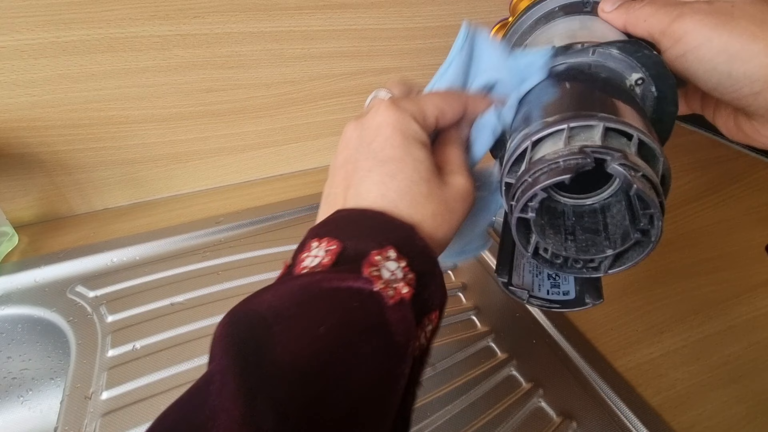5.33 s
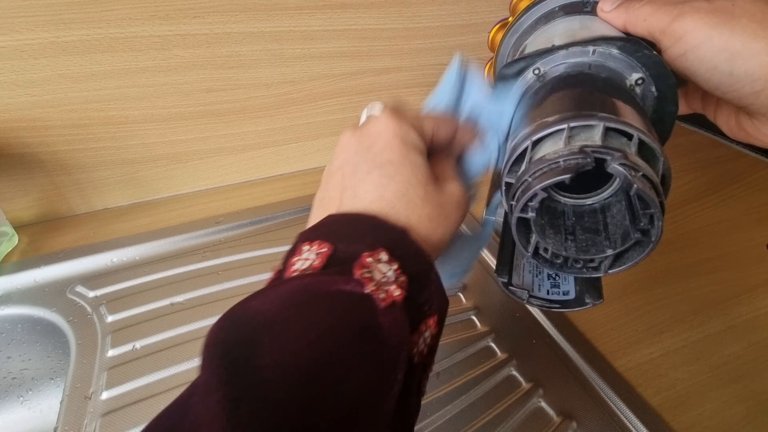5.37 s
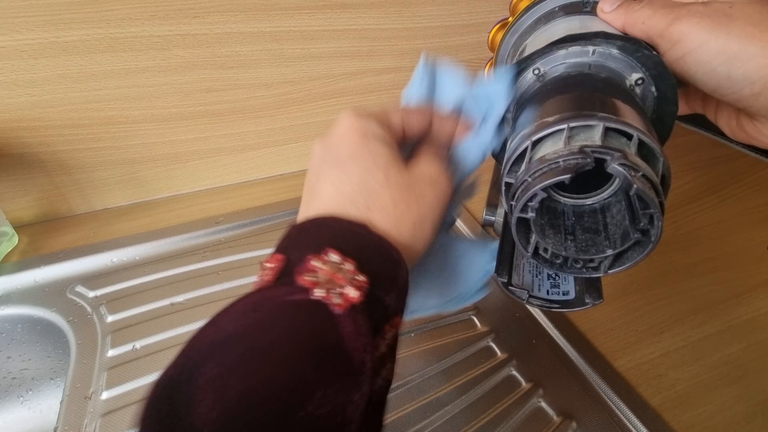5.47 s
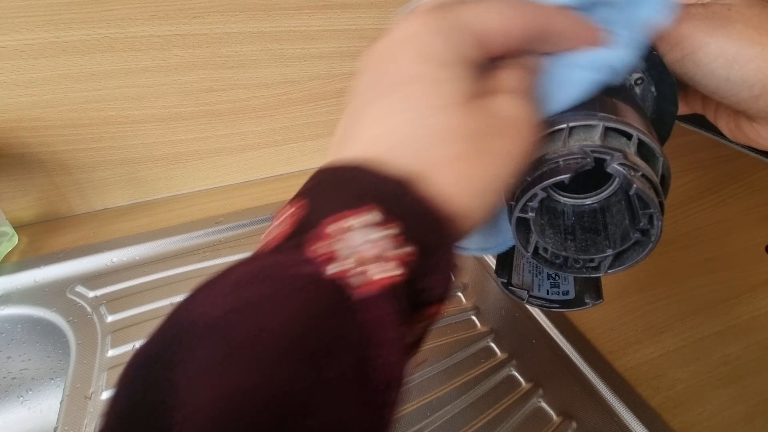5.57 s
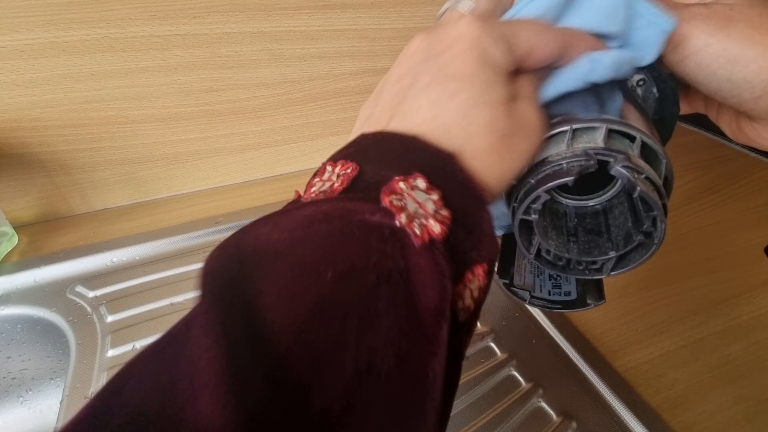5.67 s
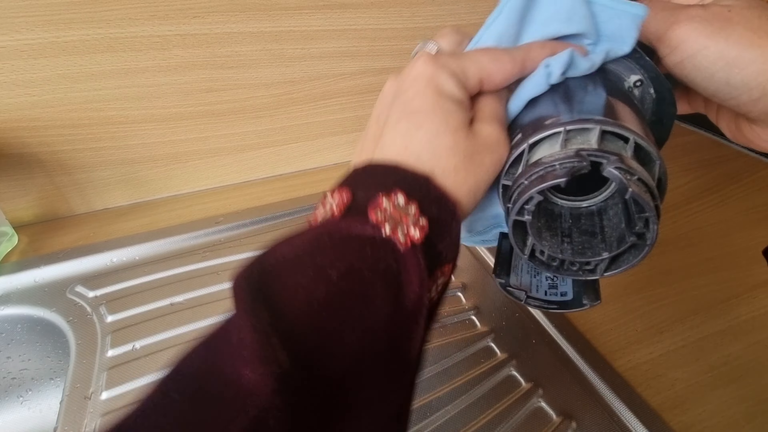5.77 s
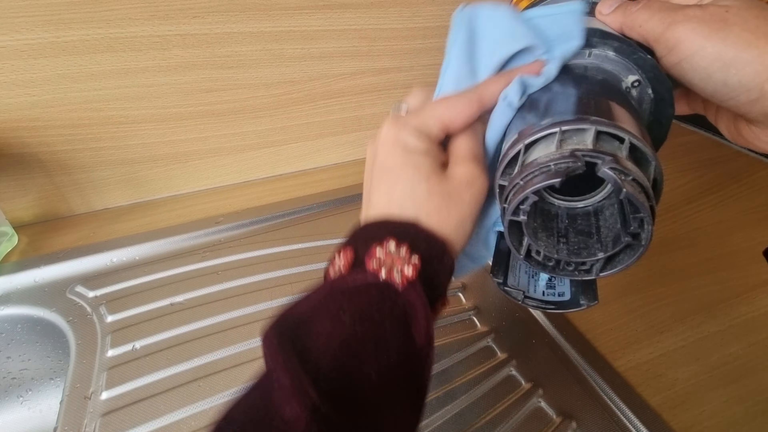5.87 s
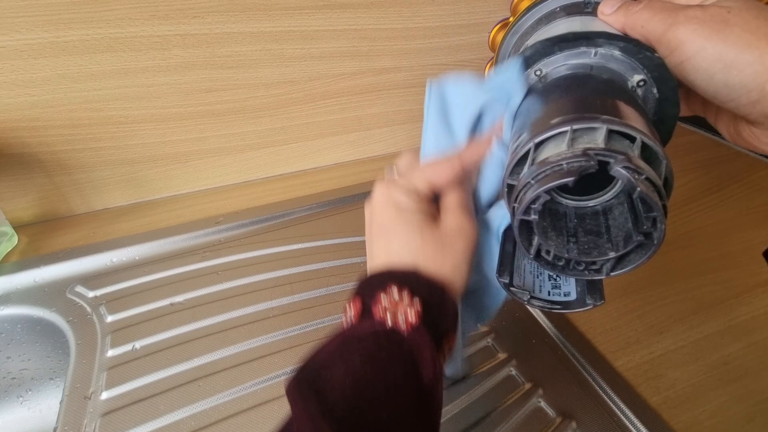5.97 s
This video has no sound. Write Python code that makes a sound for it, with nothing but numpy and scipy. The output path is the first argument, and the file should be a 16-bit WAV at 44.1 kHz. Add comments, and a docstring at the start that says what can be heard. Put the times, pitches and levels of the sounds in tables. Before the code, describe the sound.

A dry cloth wipes a hollow plastic vacuum cleaner part in soft, overlapping strokes, some quick and some slow. The plastic ticks, creaks and briefly squeaks in the grip, over a faint low handling rumble. After a quieter stretch of rubbing, the part bumps heavily once and rattles, then the wiping and clicking carry on. It is heard close up in a kitchen with a slight echo.

```python
"""Wiping a hollow plastic part

A dry cloth rubs a vacuum-cleaner part above a kitchen sink, in overlapping strokes, quick or slow.
The fibres hiss as they catch and let go. The plastic ticks and creaks as it slips in the grip,
and the hands make it rumble softly. Once the part bumps down heavily and rattles; then the wiping
goes on. The small clicks and the rattle echo briefly in the kitchen."""
import sys
import numpy as np
from scipy import signal
from scipy.fft import rfft, irfft, next_fast_len
from scipy.io import wavfile
from scipy.ndimage import uniform_filter1d

SR = 44100
rng = np.random.default_rng(int(sys.argv[2]) if len(sys.argv) > 2 else 0)


def materialize(psi):
    """Save the field psi as 16-bit PCM at rate SR to the path in sys.argv[1].

    A 1-D psi becomes a single channel; in a 2-D psi each row is a channel.
    """
    bounded = np.clip(np.atleast_2d(psi).T, -1, 1)
    quanta = np.round(bounded * 32767).astype(np.int16)
    wavfile.write(sys.argv[1], SR, quanta)


N = 265658
TIME = np.arange(N) / SR

# Levels are relative: the functions add their own gains. A fade time is how long a 60 dB drop takes.
# cloth strokes: (fastest moment [s], speeding up [s], slowing down [s], hiss [dB], sheen [dB], drag [dB])
STROKES = [(0.015, 0.052, 0.049, -51, -54, -50), (0.2, 0.26, 0.39, -72, -96, -66.5),
           (0.344, 0.048, 0.15, -55, -83, -52.5), (0.55, 0.085, 0.26, -59, -85, -53.5),
           (0.711, 0.025, 0.033, -47.5, -49.5, -60), (1.052, 0.05, 0.1, -55, -85, -51),
           (1.3, 0.095, 0.13, -49.5, -63.5, -47.5), (1.58, 0.25, 0.37, -63, -85, -61),
           (2.119, 0.25, 0.31, -62, -70.5, -62), (2.36, 0.11, 0.55, -72.5, -86, -69),
           (2.79, 0.14, 0.17, -59.5, -66.5, -66), (3.215, 0.04, 0.39, -65, -72, -67.5),
           (3.46, 0.06, 0.081, -66, -70, -65.5), (3.619, 0.16, 0.31, -62, -69.5, -65),
           (4.079, 0.084, 0.22, -57, -65, -58), (4.3, 0.12, 0.5, -56.5, -62, -63.5),
           (4.53, 0.057, 0.057, -48, -49.5, -55), (5.04, 0.12, 0.2, -52.5, -60, -52.5),
           (5.21, 0.052, 0.092, -53.5, -58, -61), (5.333, 0.063, 0.046, -52.5, -53.5, -54.5),
           (5.49, 0.089, 0.4, -65.5, -72.5, -64), (5.67, 0.051, 0.17, -59, -76, -52.5),
           (5.99, 0.15, 0.25, -44.5, -51.5, -47)]
# the cloth grips and squeaks: (time [s], level [dB], pitch [Hz], rate of pitch fall [1/s])
SQUEAKS = [(0.524, -31, 1138, 56), (1.036, -31, 1063, 11), (3.618, -49, 1395, 4), (5.15, -34, 1335, 12),
           (5.613, -33, 1330, 5)]
# plastic slips in the grip: (time [s], level [dB], centre pitch [Hz], treble against that level [dB])
SLIPS = [(0.322, -29.5, 1600, -12.5), (0.349, -38.5, 1370, -29), (0.396, -28.5, 1430, -16),
         (0.6915, -30, 1140, -11.5), (0.7062, -32.5, 1360, -23), (0.7294, -33, 1150, -13),
         (0.746, -33.5, 1283, -32), (1.0184, -36.5, 1290, -10), (1.069, -32, 1320, -12),
         (1.286, -33, 1400, -23), (1.3187, -34.5, 1600, -9), (1.4853, -31.5, 1500, -10.5),
         (4.0417, -34.5, 1060, -8.5), (4.114, -36.5, 1610, -30), (4.354, -41.5, 1045, -10),
         (4.934, -39, 1070, -7.5), (4.9876, -36.5, 1127, -20), (5.0386, -38, 1340, -11.5),
         (5.0944, -31.5, 1520, -13.5), (5.203, -31.5, 1120, -29), (5.219, -32, 1680, -11),
         (5.6003, -31.5, 1160, -11), (5.6369, -29, 1090, -15), (5.913, -29.5, 2010, -22)]
# the thin ribs snap: (time [s], level [dB], centre pitch [Hz])
SNAPS = [(0.18, -47.5, 4180), (1.055, -23, 5300), (1.4866, -27, 4420), (1.907, -43, 8350),
         (2.571, -30, 6900), (2.6926, -29, 6640), (4.0369, -33, 3990), (4.673, -27.5, 7300),
         (5.2209, -21, 7600), (5.911, -26, 2900)]
# blows on the body: (time [s], strength [dB], contact length [s], rattle [dB])
BLOWS = [(1.319, -33, 0.0025, -38.5), (1.352, -30.5, 0.0028, -49), (4.569, -11, 0.0062, -12.5),
         (4.596, -11.5, 0.0089, -60), (4.62, -14, 0.00072, -21), (4.63, -27, 0.0018, -18.5),
         (4.649, -31, 0.002, -29), (4.675, -20, 0.00049, -14.5), (4.756, -32, 0.011, -61),
         (5.204, -37.5, 0.00085, -40), (5.638, -47.5, 0.00033, -40)]
# the wiping tugs at the holding hand: (time [s], sway [dB], hollow hum [dB])
TUGS = [(0.04, -53.5, -48.5), (0.28, -49.5, -55.5), (0.39, -48.5, -44.5), (0.61, -52, -52),
        (0.78, -50.5, -51.5), (1.08, -48.5, -45), (1.33, -59, -43), (1.66, -53, -58), (2.16, -56, -59.5),
        (2.86, -53.5, -56), (4.122, -48, -46), (4.26, -53.5, -54.5), (4.41, -63, -51.5),
        (5.07, -43.5, -46.5), (5.2, -54, -47.5), (5.33, -55, -54), (5.65, -66, -46), (5.78, -71, -53),
        (5.981, -41.5, -37.5)]
# soft pushes of the palm, and near the end a knock on the hollow: (time [s], level [dB], pitch [Hz])
PUSHES = [(0.943, -39.5, 89.8), (1.408, -23.5, 58.6), (1.457, -31.5, 55.3), (2.03, -34.5, 81),
          (2.425, -36, 69), (2.499, -42, 73), (3.209, -40, 62.5), (3.266, -37.5, 64.4), (3.362, -40, 79),
          (3.608, -44.5, 72.4), (5.936, -28, 64), (5.991, -19, 111.4)]
# fingers scuff the wall: (time [s], level [dB], fade time [s], rasp against that level [dB])
SCUFFS = [(0.096, -46, 0.05, 2.5), (0.731, -36.5, 0.019, 6), (1.307, -36.5, 0.17, -10),
          (2.337, -49, 0.069, -1), (3.378, -40.5, 0.13, -7.5), (3.676, -47, 0.05, 4),
          (5.203, -30.5, 0.064, -2.5), (5.217, -36, 0.093, -1)]

# Modes are the tones an object rings with when it is hit.
# the thin shell and its ribs: (pitch [Hz], level [dB], fade time [s])
SHELL_MODES = [(1058, 0.5, 0.043), (1210, -0.5, 0.048), (1353, 0, 0.043), (1705, -5.5, 0.078),
               (1877, -7, 0.087), (1994, -8.5, 0.097), (2970, 0, 0.08)]
RIB_MODES = [(3480, -6, 0.055), (4320, -3, 0.03), (5410, -2.5, 0.035), (6790, -10.5, 0.036),
             (7370, -3, 0.032)]
# the whole part on its support: (pitch [Hz], level [dB], fade time [s], left-right phase [rad])
BODY_MODES = [(52.84, 1.5, 0.76, 0.38), (118.5, 3, 0.3, 0.13), (148.4, -5.5, 0.61, 0.27),
              (199, 6.5, 0.21, 0.44), (281, -17.5, 0.31, 2), (320, -4.5, 0.48, 0.22),
              (409.8, 0.5, 0.21, 1.15), (443, 3, 0.087, 1.9), (778, -13, 0.26, 1.8), (814, -5.5, 0.25, 2.5),
              (1070, -3, 0.11, 1.7), (1367, -1.5, 0.1, 2.36)]

# tone colours, or how strong each noise is from low to high: (frequency [Hz], level [dB])
HISS_COLOUR = [(1200, -6), (2200, 0.5), (3200, 3), (4700, -2), (6000, -2.5), (7400, -1.5), (8200, -9),
               (9200, -33), (11000, -32)]  # fibres on plastic
SHEEN_COLOUR = [(6500, -48), (8200, 6), (9300, 4.5), (10800, -2.5), (12500, 3.5), (16000, 3.5)]  # the fine, very high hiss of quick sweeps
DRAG_COLOUR = [(450, -24.5), (790, 7.5), (900, -3.5), (1060, 3), (1190, -2.5), (1340, 2), (1540, 1.5),
               (1860, -2.5), (2300, -4.5), (3600, -22)]  # cloth dragging on the shell
WALL_COLOUR = [(170, 2), (260, -5), (315, 4.5), (365, 8), (420, -1), (490, -3.5), (560, 1.5), (700, -12.5),
               (1000, -51)]  # the rubbed walls
TICK_COLOUR = [(500, -2), (850, -8), (1100, -1), (1400, 5), (1850, 2), (2300, -5), (2850, -0.5),
               (4000, -31), (6000, -34)]  # the scrape of a slip
TICK_EDGE_COLOUR = [(1800, -8), (2900, 1.5), (4000, 3.5), (5000, -5), (7400, -7), (9500, -21), (16000, -67)]  # its bright edge
SNAP_COLOUR = [(700, -0.5), (3000, -3.5), (5400, -4.5), (6800, 3), (8500, -5), (11000, -15.5), (15500, -8)]  # a sharp click
RATTLE_COLOUR = [(35, -11), (120, 9.5), (220, -2), (380, 6.5), (520, -1.5), (850, -2), (1300, -6),
                 (1600, -13), (4000, -18.5), (5200, -22), (7500, -24.5), (10000, -37), (16000, -34)]  # loose fittings
SWAY_COLOUR = [(24, -24), (36, -21), (46, 31), (53, 33), (62, 17), (80, 26.5), (115, -80)]  # the part swaying in the hand
HOLLOW_COLOUR = [(70, -69), (98, -20), (114, 13), (135, -10.5), (155, -11.5), (175, -11), (198, -5.5),
                 (240, -25), (330, -59)]  # its hollow hum
SCUFF_COLOUR = [(80, -31), (160, 11.5), (320, 3), (540, -9.5), (1400, -60)]  # a finger's dull bump
RASP_COLOUR = [(450, -28), (790, 7.5), (1000, -9), (1500, -9), (2400, -13), (5000, -48)]  # a finger's skid

# how alike the two ears are: (frequency [Hz], correlation [-1 to 1])
EAR_LIKENESS = [(60, 0.95), (130, 0.93), (290, 0.67), (450, 0.11), (680, -0.18), (1400, -0.3),
                (3000, -0.076), (15000, -0.08)]
# lean to one side: (frequency [Hz], left minus right [dB])
SIDE_LEAN = [(100, 0), (380, 0), (700, 0), (1300, -0.5), (3000, -0.3), (9000, -2)]
# the kitchen's echo: (frequency [Hz], fade time [s])
ROOM_FADE = [(150, 0.64), (600, 0.063), (2500, 0.39), (10000, 0.36)]


def cloth(hiss, sheen, drag):
    """Fibres catch and let go on the plastic and stir its walls; quick sweeps add a fine sheen."""
    fibres = hiss * from_db(5.5) * roaming_friction(HISS_COLOUR, grain_db=1.8)
    fine = sheen * from_db(1.5) * friction(SHEEN_COLOUR, grain_db=0.5)
    shell = drag * from_db(3) * roaming_friction(DRAG_COLOUR, grain_db=1.5)
    wall_gain = drag ** 0.71 * from_db(-14 + 2 * wander(per_s=25))  # swells less than the drag does
    wall = wall_gain * friction(WALL_COLOUR, grain_db=4)
    flicker = from_db(1.22 * wander(per_s=90))
    return (fibres + fine + shell) * flicker + wall


def wiping_effort(rest_db=(-75, -87, -78)):
    """Gains for hiss, sheen and drag: each stroke speeds up and eases off, overlapping the next."""
    power = from_db(rest_db)[:, None] ** 2  # the cloth never lies quite still
    for s, rise_s, fall_s, *levels_db in STROKES:
        span_s = np.where(TIME < s, rise_s, fall_s)
        roundness = 1.33 + 2 * span_s  # 1 is pointed, 2 is a bell: slow strokes hold their speed longer
        speed = np.exp(-np.minimum(np.abs(TIME - s) / span_s, 10) ** roundness)
        power = power + (from_db(levels_db)[:, None] * np.maximum(speed, 1e-9)) ** 2
    return np.sqrt(power)


def friction(colour, grain_db=0, ripple_db=2.2, ripple_step_hz=110):
    """Countless tiny impacts blur into stereo noise; more grain makes their sizes more uneven."""
    size = next_fast_len(N)
    hz = np.arange(size // 2 + 1) * SR / size
    grains = from_db(grain_db * np.minimum(rng.exponential(1, size // 16 + 1), 6))
    middle, side = rfft(rng.standard_normal((2, size)) * grains.repeat(16)[:size])
    alike = np.clip(at_hz(EAR_LIKENESS, hz), -.99, .99)
    ears = np.sqrt(1 + alike) * middle + np.sqrt(1 - alike) * side * [[1], [-1]]
    # the shell's crowded upper modes put small peaks and dips in the colour
    steps_hz = np.arange(0, SR / 2, ripple_step_hz)
    ripple = np.interp(hz, steps_hz, ripple_db * rng.standard_normal(len(steps_hz)) * (steps_hz > 600))
    spectrum = ears * from_db(at_hz(colour, hz) + ripple) * panned(at_hz(SIDE_LEAN, hz))
    return unit_level(irfft(spectrum, size)[:, :N])


def roaming_friction(colour, grain_db, spots=4):
    """The cloth travels between spots on the shell, each with a colour of its own."""
    shares = from_db([10 * wander(per_s=9) for _ in range(spots)])
    shares = shares / np.sqrt(np.sum(shares ** 2, axis=0))
    return sum(share * friction(colour, grain_db, ripple_db=3.4) for share in shares)


def snags(effort, colour, per_s, level_db, fade_s):
    """Threads snag faintly at random, harder where the cloth works more."""
    chance, size = rng.random(N), rng.standard_normal(N)
    at = np.flatnonzero(chance < per_s / SR)
    return effort * friction(colour) * bursts(at / SR, level_db + 3 * size[at], .001, fade_s)


def squeaks(swell_s=0.00236, roughness=0.15):
    """The cloth sticks and slips about a dozen times in a quick, uneven, falling chirp."""
    out, t = np.zeros((2, N)), TIME[:SR // 30]
    jitter = roughness * wander(per_s=2000)
    for s, db, hz, fall_per_s in SQUEAKS:
        uneven = jitter[int(s * SR):][:len(t)]
        pitch_hz = hz * np.exp(-fall_per_s * (t - 2 * swell_s) + uneven)
        phase = 2 * np.pi * np.cumsum(pitch_hz) / SR
        swell = t / swell_s * np.exp(1 - t / swell_s + uneven)
        add(out, s, from_db(db) * swell * np.sin(phase + np.array([[0], [1.2]])))
    return out


def ticks(rise_s=0.00068, scrape_fade_s=0.042):
    """Each slip in the grip is a brief dry scrape that makes the shell ring."""
    out, t = np.zeros((2, N)), TIME[:SR // 6]
    scrape, edge = friction(TICK_COLOUR), friction(TICK_EDGE_COLOUR)
    onset = 1 - np.exp(-t / rise_s)
    for s, db, centre_hz, treble_db in SLIPS:
        ring = from_db(-4.5) * ringing(SHELL_MODES, centre_hz, t, spread_octaves=0.64, uneven_db=3.5)
        here = (int(s * SR) + np.arange(len(t))) % N
        crack = from_db(0.5) * scrape[:, here] + from_db(8 + treble_db) * edge[:, here]
        add(out, s, from_db(db) * panned(-2.5) * onset * (ring + crack * fade(t, scrape_fade_s)))
    return out


def snaps(click_db=-4.5, ring_db=-9.5):
    """Thin ribs flick back with a bright click and a brief ping."""
    times, levels_db, _ = np.transpose(SNAPS)
    out = friction(SNAP_COLOUR) * bursts(times, levels_db + click_db, rise_s=0.00042, fade_s=0.019)
    for s, db, centre_hz in SNAPS:
        ping = ringing(RIB_MODES, centre_hz, TIME[:SR // 10], spread_octaves=0.41, uneven_db=1.3)
        add(out, s, from_db(db + ring_db) * ping)
    return out


def ringing(modes, centre_hz, t, spread_octaves, uneven_db):
    """A contact rings the modes near its centre pitch, each with its own strength in each ear."""
    hz, mode_db, fade_s = np.transpose(modes)
    tones = fade(t, fade_s[:, None]) * np.exp(2j * np.pi * hz[:, None] * t)
    nearness = np.exp(-(np.log2(hz / centre_hz) / spread_octaves) ** 2 / 2)
    strengths = nearness * from_db(mode_db + uneven_db * rng.standard_normal((2, len(hz))))
    phases = np.exp(2j * np.pi * rng.random(strengths.shape))
    return np.imag((strengths * phases) @ tones)


def knocks(level_db=-1.5, rebound_s=0.01716, rebound_db=-10.5, rebound_contact_s=0.0046):
    """Each blow and its weaker rebound ring the body: the shorter the contact, the brighter it sounds."""
    force, out = np.zeros((1, N)), np.zeros((2, N))
    for s, db, contact_s, _ in BLOWS:
        rebound = (s + rebound_s, db + rebound_db, rebound_contact_s)
        for at, strength_db, length_s in ((s, db, contact_s), rebound):
            pulse = np.hanning(max(int(length_s * SR), 3))
            add(force, at - length_s / 2, from_db(strength_db + level_db) * pulse / pulse.sum())
    for hz, db, fade_s, ear_phase in BODY_MODES:
        pole = fade(1 / SR, fade_s) * np.exp(2j * np.pi * hz / SR)  # one sample's step of a fading tone
        ring = signal.lfilter([1], [1, -pole], force[0] + 1e-18)
        ears = np.imag(ring * np.exp(.5j * ear_phase * np.array([[1], [-1]])))
        out += from_db(db) * panned(at_hz(SIDE_LEAN, hz)) * ears
    return filtered(out, 6, [50, 2000], "band")


def rattle(crack_db=6, tail_db=-8):
    """The loose fittings crack at every blow and clatter on, duller."""
    s, _, _, db = np.transpose(BLOWS)
    crack = friction(RATTLE_COLOUR, grain_db=2) * bursts(s - .002, db + crack_db, .001, fade_s=.045)
    tail = friction(RATTLE_COLOUR, grain_db=1.5) * bursts(s, db + tail_db, .0021, fade_s=.46)
    return (crack + filtered(tail, 1, 3000, "low")) * panned(-0.11)


def grip_rumble(tug_width_s=0.078, rest_db=-70):
    """Each tug swells and fades, stirring the part's low tones; between tugs it lies almost still."""
    power = from_db(rest_db) ** 2
    for s, *levels_db in TUGS:
        swell = np.exp(-2 * np.minimum(((TIME - s) / tug_width_s) ** 2, 20))
        power = power + from_db(levels_db)[:, None] ** 2 * swell
    sway_gain, hollow_gain = np.sqrt(power)
    sway = sway_gain * from_db(6) * steadied(friction(SWAY_COLOUR), span_s=0.05)
    hollow = hollow_gain * from_db(1.5) * steadied(friction(HOLLOW_COLOUR), span_s=0.0108)
    return sway + hollow


def palm_pushes(swell_s=0.023):
    """The palm nudges the part, and once knocks its hollow: a few low wobbles that die away at once."""
    out, t = np.zeros((2, N)), TIME[:SR // 3]
    swell = (t / swell_s) ** 2 * np.exp(2 - 2 * t / swell_s)
    for s, db, hz in PUSHES:
        add(out, s, from_db(db) * swell * np.sin(2 * np.pi * hz * t))
    return out


def finger_scuffs(rise_s=0.0017):
    """A finger skids a short way: a dull, grainy bump of the wall with a light rasp."""
    bump_power = rasp_power = 0
    for s, db, fade_s, rasp_db in SCUFFS:
        bump_power += bursts([s], [db], rise_s, fade_s) ** 2
        rasp_power += bursts([s], [db + rasp_db], rise_s, fade_s) ** 2
    bump = np.sqrt(bump_power) * steadied(friction(SCUFF_COLOUR), span_s=0.0082)
    return bump + np.sqrt(rasp_power) * friction(RASP_COLOUR)


def kitchen(x, echo_db):
    """Sound bounces off worktop, sink and walls; the bass lingers longest."""
    t, echo = TIME[:SR // 2], 0
    edges_hz = np.geomspace(120, 16000, 8)
    for low, high in zip(edges_hz, edges_hz[1:]):
        band = filtered(rng.standard_normal((2, len(t))), 2, [low, high], "band")
        echo = echo + band * fade(t, at_hz(ROOM_FADE, np.sqrt(low * high)))
    echo = echo * (t > .004)  # the first bounce arrives after 4 ms
    echo = echo / np.sqrt(np.sum(echo ** 2) / 2)
    return x + from_db(echo_db) * signal.fftconvolve(x, echo, axes=1)[:, :N]


def bursts(times, levels_db, rise_s, fade_s):
    """The loudness curve of contacts that swell quickly and die away."""
    power, t = np.zeros((1, N)), TIME[:SR // 2]
    for s, db in zip(times, levels_db):
        burst = from_db(db) * fade(t, fade_s) * (1 - np.exp(-t / rise_s))
        add(power, s, burst ** 2)
    return np.sqrt(power)


def steadied(x, span_s):
    """Even out the chance swells of a narrow band of noise."""
    power = uniform_filter1d(np.mean(x ** 2, axis=0), max(int(span_s * SR), 2))
    return unit_level(x / np.sqrt(power + 0.026))


def wander(per_s):
    """A curve of typical size 1 that heads for a new random value per_s times a second."""
    times = np.arange(0, 8, 1 / per_s)
    return unit_level(np.interp(TIME, times, rng.standard_normal(len(times))))


def fade(t, fade_s):
    """A gain that drops 60 dB every fade_s seconds."""
    return from_db(-60 * t / fade_s)


def filtered(x, order, hz, kind):
    """Keep a range of frequencies; a higher order cuts more steeply."""
    return signal.sosfilt(signal.butter(order, hz, kind, fs=SR, output="sos"), x)


def from_db(db):
    """Turn decibels into a gain."""
    return 10 ** (np.asarray(db) / 20)


def unit_level(x):
    """Scale to an average (rms) level of 1."""
    return x / np.sqrt(np.mean(x ** 2) + 1e-20)


def at_hz(table, hz):
    """Read between a table's rows, with octaves evenly spaced."""
    row_hz, values = np.transpose(table)
    return np.interp(np.log(np.maximum(hz, 1)), np.log(row_hz), values)


def panned(db):
    """Left and right gains for a level difference."""
    return from_db(np.array([[.5], [-.5]]) * db)


def add(out, s, sound):
    """Mix a short sound in at s seconds."""
    i = max(int(s * SR), 0)
    out[:, i:i + sound.shape[-1]] += sound[..., :max(N - i, 0)]


def scene():
    """Wiping and handling close by, with the rattle and small contacts echoing in the room."""
    hiss, sheen, drag = wiping_effort()
    wiping = cloth(hiss, sheen, drag)
    handling = grip_rumble() + palm_pushes() + finger_scuffs()
    contacts = ticks() + snaps() + squeaks()
    contacts += snags(drag, DRAG_COLOUR, per_s=9, level_db=3, fade_s=.04)
    contacts += snags(hiss, SNAP_COLOUR, per_s=22, level_db=7, fade_s=.012)
    bumps = knocks() + kitchen(rattle(), echo_db=-9)
    return wiping + handling + bumps + kitchen(contacts, echo_db=-6.5)


def record(dry):
    """Clip the tallest peaks, then cut the treble above 15900 Hz."""
    treble_cut = signal.ellip(10, .1, 80, 15900, fs=SR, output="sos")
    return signal.sosfilt(treble_cut, np.clip(dry, -.92, .92))


dry = scene()
out = record(dry)
materialize(out)
```